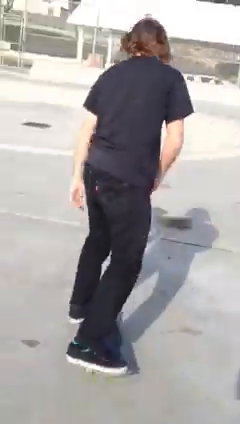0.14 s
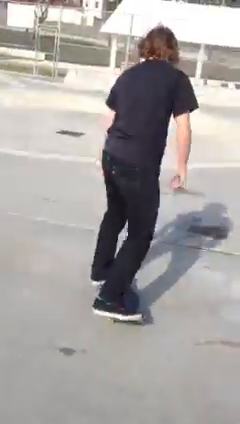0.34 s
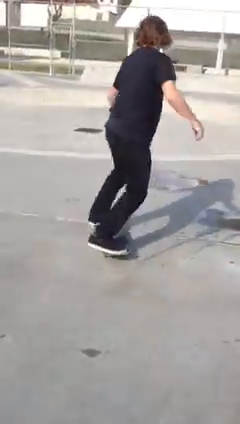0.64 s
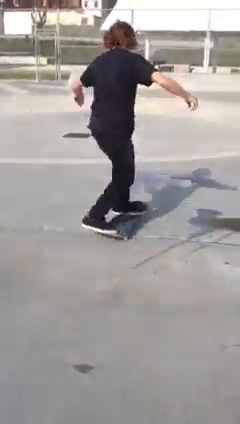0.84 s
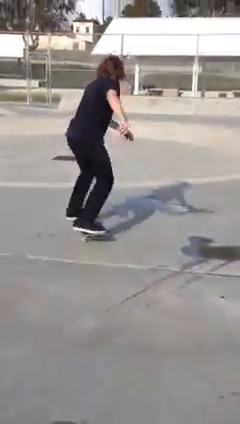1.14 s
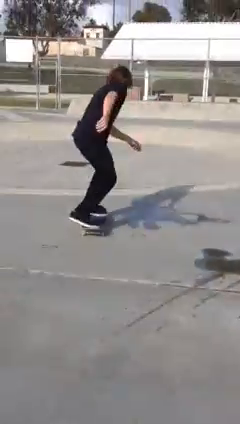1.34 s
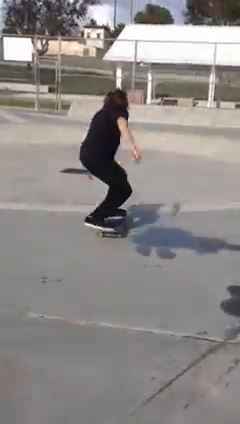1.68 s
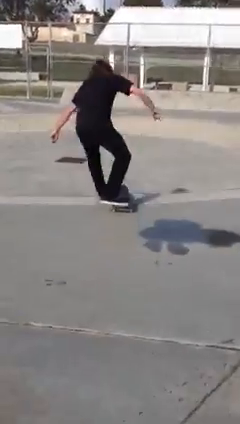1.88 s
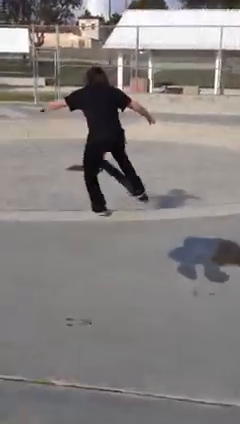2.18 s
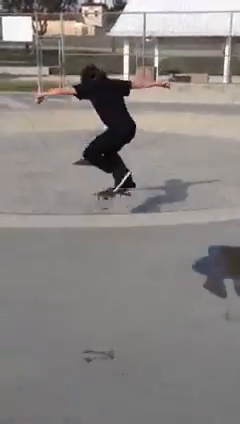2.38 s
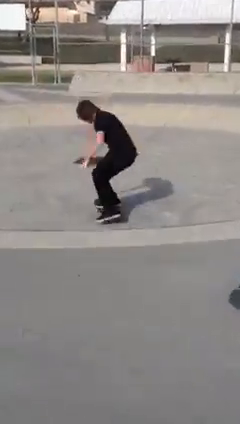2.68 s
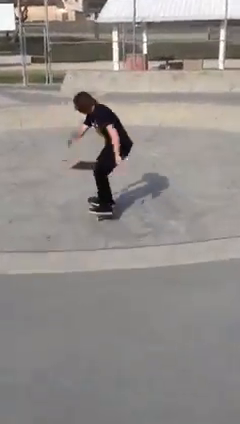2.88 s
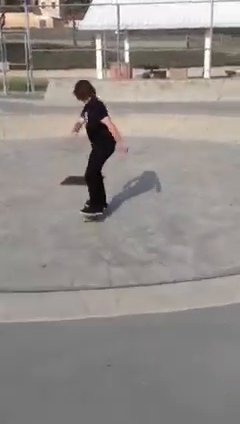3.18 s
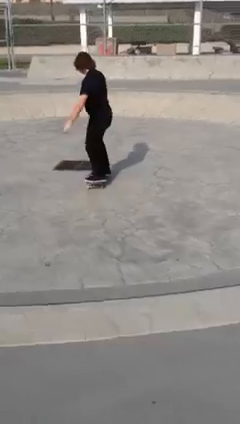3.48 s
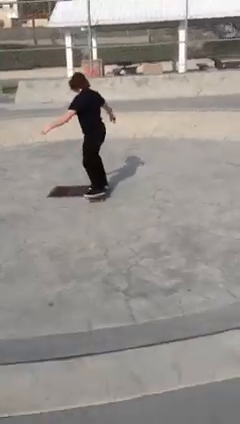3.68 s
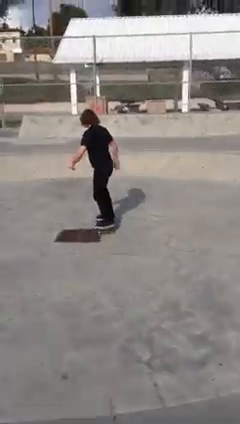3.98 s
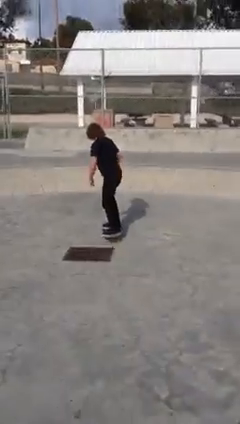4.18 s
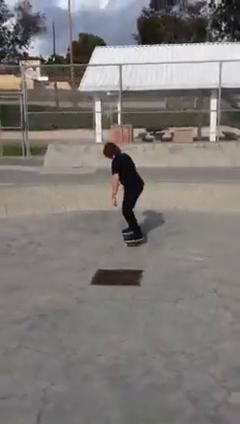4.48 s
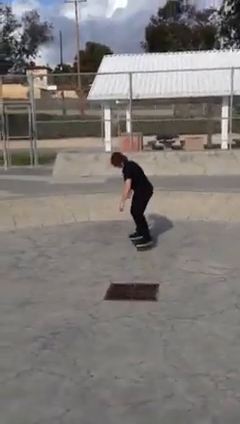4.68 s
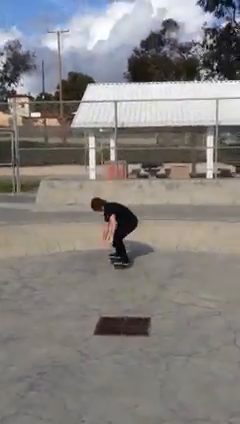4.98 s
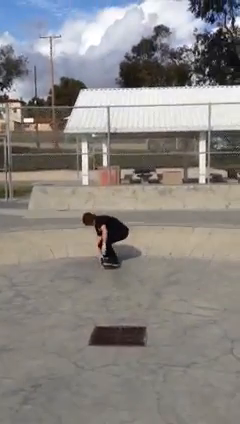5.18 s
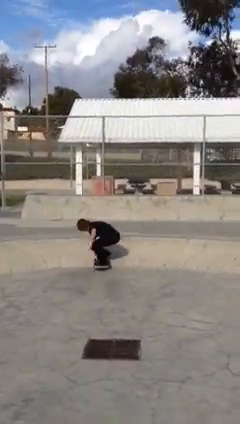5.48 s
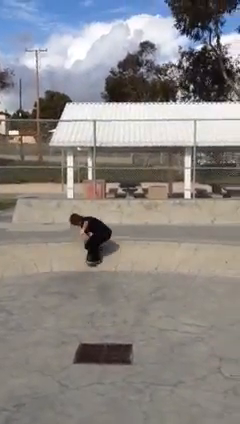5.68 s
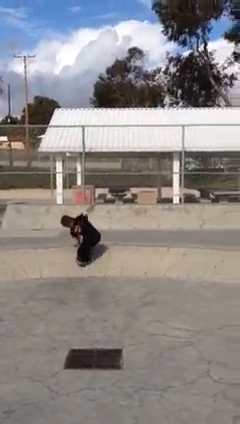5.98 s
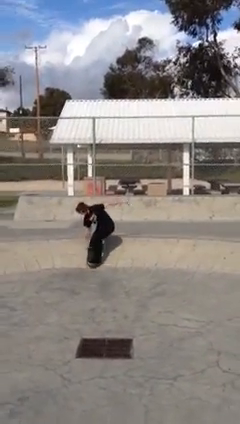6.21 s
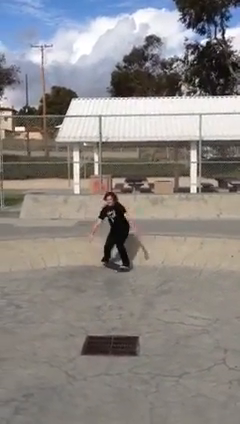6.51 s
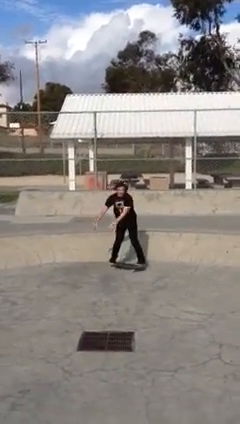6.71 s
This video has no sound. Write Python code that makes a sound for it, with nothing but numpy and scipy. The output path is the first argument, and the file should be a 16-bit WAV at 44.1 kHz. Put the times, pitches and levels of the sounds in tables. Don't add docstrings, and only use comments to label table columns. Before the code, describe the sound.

A skateboard rolls away with a grainy, hollow rumble. Close clacks snap in uneven clusters, followed by a tail scrape, a cracking landing and a duller, heavy slap with a rattle. Wind thumps low at the handheld microphone. Afterward come rough grit, dry scuffs and a few weaker distant pops, with short dull echoes from low concrete walls.

```python
import sys
import numpy as np
from scipy import signal
from scipy.fft import rfft, irfft, next_fast_len
from scipy.io import wavfile
from scipy.ndimage import uniform_filter1d

SR = 44100
rng = np.random.default_rng(int(sys.argv[2]) if len(sys.argv) > 2 else 0)


def pcm_store(signal):
    levels = np.round(np.clip(np.atleast_2d(signal), -1, 1) * 32767)
    wavfile.write(sys.argv[1], SR, levels.astype(np.int16).T)


def linear_from_db(decibels):
    return 10 ** (np.asarray(decibels, float) / 20)


N = 302085

# pitch_hz, level_db_per_hz
PARK = [(180, -34), (300, -13.5), (749, -6.5), (2100, -18.5), (5080, -24), (7080, -22), (10200, -26.5),
        (14700, -30), (16000, -31)]
# pitch_hz, level_db_per_hz
WIND = [(15, -63), (25, -51.5), (129, 6), (162, 7.5), (178, 7), (242, 1), (264, -34), (320, -43.5),
        (420, -62.5), (700, -120)]
# centre_s, half_length_s, change_db
GUSTS = [
    (1.85, 0.15, 12.5),
    (2.1, .05, -13),
    (2.55, 0.28, 4),
    (3.42, 0.23, 13.5),
    (3.82, 0.11, -11),
    (4.0, 0.024, 4),
    (4.4, 0.16, 4),
    (5.95, 0.089, 1.5),
    (6.5, 0.036, 7.5),
    (6.72, 0.064, -3),
]
# start_s, length_s, level_db, centre_hz
PUFFS = [(3.09, 0.036, -33.5, 161), (3.36, 0.034, -30.5, 163), (4.88, 0.056, -42, 133),
         (5.075, 0.052, -35, 170), (5.21, 0.085, -34.5, 164), (5.81, 0.054, -45, 120),
         (6.085, 0.028, -40, 132)]
# start_s, length_s, level_db, centre_hz
BEARINGS = [(1.42, 0.28, -55, 3580), (2.2, 0.24, -77, 8400), (2.2, 0.28, -79, 6200),
            (2.146, 0.021, -32.5, 4200), (2.146, 0.031, -35.5, 2800), (2.146, 0.023, -28, 1040),
            (3.7, 0.068, -43, 1580)]
# start_s, length_s, level_db, centre_hz
SCUFFS = [(1.245, 0.038, -40, 2480), (1.86, 0.032, -45.5, 7000), (2.04, 0.077, -40, 5000),
          (2.148, 0.023, -39, 2500), (3.32, 0.029, -42.5, 6600), (4.23, 0.018, -49, 4050),
          (4.305, 0.086, -44.5, 7300), (4.515, 0.055, -50.5, 7000), (4.59, .012, -51, 8000),
          (4.715, 0.011, -54, 8000), (4.775, 0.1, -44.5, 4870), (6.37, 0.016, -40, 6000),
          (6.42, 0.093, -36.5, 5340), (6.42, 0.064, -48.5, 900), (6.22, 0.18, -59.5, 725),
          (2.0, 0.065, -39.5, 1500), (3.12, 0.09, -49, 8000), (2.84, 0.17, -52.5, 11000),
          (3.52, 0.0504, -46, 7900), (6.17, .02, -56, 7040), (6.495, 0.068, -47, 7000)]
# time_s, deck_load_db, grit_db
ROLL = [(0, -35.5, -49), (.45, -42.5, -48.5), (.9, -45.5, -51), (1.35, -44.5, -48), (1.72, -40.5, -46.5),
        (2.2, -32, -45.5), (2.7, -35.5, -52.5), (3.1, -37, -49), (3.5, -33, -50), (3.87, -38.5, -55),
        (3.97, -44.5, -56), (4.43, -39, -53), (4.62, -50.5, -64), (5.27, -56, -60.5), (5.7, -45.5, -56),
        (5.951, -67.5, -76.5), (6.41, -45.5, -49.5), (6.85, -57, -59.5)]
# centre_s, half_length_s, extra_load_db, extra_grit_db
PATCHES = [
    (.21, 0.067, 3, 4),
    (2.03, 0.12, 10, -1.5),
    (2.1, 0.063, -4.5, 7.5),
    (3.66, 0.063, 6.5, 2),
    (4.33, 0.046, -0.3, 8),
    (4.88, 0.24, 12.5, 8),
    (5.7, .04, -5, 6),
    (6.63, 0.051, 0, 2.5),
    (2.95, 0.078, 1, 1),
]
# pitch_hz, width_hz, level_db
DECK = [(274, 164, 0.5), (408.6, 43, 7.5), (669, 33, -6.5), (921, 37, 3.5)]
# pitch_hz, level_db_per_hz
GRIND = [(700, -20), (1100, 0), (1700, -1), (1950, -9), (3200, -15), (4500, -30)]
# pitch_hz, width_hz, level_db
WHEELS = [(1140, 38, 5.5), (1580, 200, 7), (2280, 30, -0.5), (3540, 120, -4), (6150, 280, -31.5)]
# pitch_hz, level_db_per_hz
HISS = [(1470, -30.5), (2500, -2), (3600, -4.5), (4690, -1), (5190, -12.5), (5780, -7), (6350, -5.5),
        (7530, -8), (9150, -4.5), (10400, -18.5), (13600, -11.5), (15400, -21), (16000, -32)]
# pitch_hz, width_hz, level_db
RINGS = [(628, 43, 11.5), (644, 73, 12.5), (950, 610, -16), (1160, 89, 10)]
# pitch_hz, width_hz, level_db
THUD = [(71.5, 120, -30), (187, 42, -3), (274, 111, 0), (452, 97, 2.5)]
# pitch_hz, width_hz, level_db
TRUCKS = [(1500, 510, 26), (1816, 310, 14), (2040, 840, 19.5), (2700, 110, 4.5), (2970, 270, -6.5),
          (4300, 167, -41.5)]
# start_s, peak_db, hardness_db, rattle_ms, deck_ring_hz
JOINTS = [(.323, -18, -1, 13.6, 615), (.339, -12, -5.5, 4, 650), (.665, -11, -4, 6.5, 644),
          (.677, -11.5, -9, 6.9, 670), (.709, -19.5, -3.5, 16, 746), (.831, -21, 15, 9.7, 870),
          (.84, -14.5, 12.5, 6.2, 1070), (.965, -3.5, 0.5, 4.2, 810), (1.052, -8, 5.5, 4.8, 988),
          (1.271, -22.5, 0.5, 3, 695), (1.413, -18.5, 4.5, 10.4, 1090)]
FLIP = [(2.018, -17.5, -8, 17, 750), (2.048, -13.5, -2.5, 5.4, 598), (2.091, -12, 7.5, 6.8, 974),
        (2.148, -23, -4, 17, 1030), (2.549, -5.5, -3, 3.7, 763), (2.594, -15.5, 6.5, 10, 694),
        (2.616, -12, -2, 6.3, 910)]
DROP = [(3.587, -3.5, -13.5, 12.8, 484), (3.603, -11.5, 19.5, 3.7, 1160), (3.632, -15, -6, 12, 600),
        (3.655, -22.5, -12, 4.2, 625), (3.813, -21, 4, 10.6, 630), (3.85, -21.5, 4, 6.2, 666),
        (3.876, -13, -1, 7.5, 740), (3.886, -12, -1, 5.5, 605)]
FAR = [(5.505, -16.5, -7, 6.6, 474), (5.672, -20, 0, 7.1, 850), (6.334, -27.5, 3.7, 3.6, 770),
       (6.348, -24, -5, 9.4, 704), (6.483, -22, 10, 11, 487), (6.835, -24.5, 10.5, 10, 677)]
# start_s, peak_db, hardness_db, rattle_ms
TICKS = [(.15, -31, 1, 3.9), (.869, -29, -3, 2.9), (1.066, -24.5, 12.5, 5.1), (1.114, -38.5, 12.5, 6.9),
         (1.445, -26.5, 3, 2.4), (2.688, -32.5, 0, 11), (3.132, -32, 2, 7.2), (3.17, -40, 13, 4.5),
         (3.642, -15.5, -12, 1.6), (3.74, -28.5, 6, 5.6), (4.171, -36, 3, 8.8), (4.568, -37.5, 4, 6.4),
         (4.903, -30, -0.5, 4.4), (5.699, -38, -4, 8.7), (6.032, -52.5, 14.5, 7), (6.22, -48, 10, 8.9),
         (5.578, -60, 21, 2.5), (1.921, -26.5, 2, 6.4), (.965, -7, 2, 1.85), (6.515, -30, 11.5, 9.2)]
BUMPS = [(.749, -42, 1, 3.6), (.983, -26, 2, 2.3), (1.923, -28, -6, 9), (1.962, -23.5, -15, 11.5),
         (1.972, -40, 2.5, 10.5), (2.057, -23, 6, 7.5), (2.078, -25, 9, 20), (3.354, -38, -7, 8.6),
         (.84, -24.5, -11, 3), (3.914, -39, -1, 9.4), (4.456, -42, -14, 2.5), (5.539, -44, 2, 5.4)]
# pitch_hz, level_db
PORT = [(100, 0), (4950, 0), (5150, -2.5), (5350, 0.5), (9900, -1.5), (10300, -3), (10800, -1.5),
        (16000, 0.5)]


def unit(x):
    return x / np.sqrt(np.mean(x ** 2))


def resonate(x, modes):
    out = 0
    for k, (hz, width, db) in enumerate(modes):
        b, a = signal.iirpeak(hz, hz / max(width, 60), fs=SR)
        out = out + (-1) ** k * linear_from_db(db) * signal.lfilter(b, a, x)
    return out


def colour(x, points):
    hz, db = np.transpose(points)
    size = next_fast_len(len(x))
    f = np.maximum(np.arange(size // 2 + 1) * SR / size, 1)
    gain = linear_from_db(np.interp(np.log(f), np.log(hz), db))
    return irfft(rfft(x, size) * gain, size)[:len(x)]


def band(x, lo_hz, hi_hz, order=2):
    return signal.sosfilt(signal.butter(order, [lo_hz, hi_hz], "band", fs=SR, output="sos"), x)


def walk(rate):
    hold = int(SR / rate)
    steps = np.repeat(rng.standard_normal(N // hold + 1), hold)
    return np.clip(unit(uniform_filter1d(steps, hold)[:N]), -2, 2)


def grit(size, rate, spread_db):
    chance = rng.random((3, size))
    struck_now = chance[0] < rate / SR
    grain_db = spread_db * np.minimum(-np.log(1 - chance[2]), 4.5)
    return struck_now * np.sign(chance[1] - .5) * linear_from_db(grain_db)


def patchy(x, edges_hz, rate, patchy_db):
    lows = [0] + [signal.lfilter(*signal.butter(1, hz, fs=SR), x) for hz in edges_hz] + [x]
    return sum((hi - lo) * linear_from_db(patchy_db * walk(rate)) for lo, hi in zip(lows, lows[1:]))


def swell(table):
    s, half, *db = np.transpose(table)
    age = (np.arange(N) / SR - s[:, None]) / half[:, None]
    return np.array(db) @ np.exp(-age ** 2)


def add(out, s, x):
    i = int(s * SR)
    out[i:i + len(x)] += x[:N - i]


def bursts(table, octaves, fade, stutter_db):
    out = np.zeros(N)
    for s, length, level_db, centre_hz in table:
        size = int(max(length, .01) * SR)
        lo_hz, hi_hz = centre_hz / 2 ** octaves, min(centre_hz * 2 ** octaves, 16000)
        noise = band(grit(size=24000, rate=16000, spread_db=6.5), lo_hz, hi_hz)
        shape = signal.windows.tukey(size, np.clip(fade, .1, 1))
        add(out, s, unit(noise[2000:2000 + size]) * shape * linear_from_db(level_db))
    return out * linear_from_db(stutter_db * walk(110))


def park():
    return unit(colour(rng.standard_normal(N), PARK)) * linear_from_db(-60)


def breeze():
    wind = colour(rng.standard_normal(N), WIND)
    return unit(wind) * linear_from_db(-54 + swell(GUSTS)[0] + 2.94 * walk(40))


def puffs():
    return bursts(PUFFS, 0.53, fade=0.64, stutter_db=2.9)


def echo(x):
    gap_s, t60_s, level_db = 0.0031, 0.33, -26
    t = np.arange(12000) / SR
    tail = band(rng.standard_normal(len(t)), 130, 3050, order=1)
    tail = tail * (t > gap_s) * np.exp(-np.log(1000) * t / t60_s)
    return signal.fftconvolve(x, tail / np.sqrt(np.sum(tail ** 2)))[:N] * linear_from_db(level_db)


def bearings():
    return bursts(BEARINGS, 0.098, fade=0.42, stutter_db=2)


def scuffs():
    rubber = [(100, 24.5), (4600, -3.0), (5200, -9), (5900, -3.5), (9500, -5.0), (10500, -6.5), (16000, -5)]
    return colour(bursts(SCUFFS, 1.07, fade=0.46, stutter_db=2.66), rubber)


def rolling():
    s, *columns = np.transpose(ROLL)
    t = np.arange(N) / SR
    deck_db, hiss_db = np.array([np.interp(t, s, c) for c in columns]) + swell(PATCHES)
    load_share = 0.28
    grind_db = -2.5 + load_share * deck_db + (1 - load_share) * hiss_db
    load = walk(25)
    kicks = grit(N, 2600, spread_db=3.2)
    deck = band(resonate(kicks, DECK) + 0.79 * band(kicks, 274, 2700), 180, 1053)
    grind = colour(grit(N, 3000, spread_db=2.5), GRIND)
    grind = patchy(grind, [1500, 2400], rate=25, patchy_db=1)
    hiss = colour(grit(N, 9000, spread_db=2.2), HISS)
    hiss = patchy(hiss, [4000, 7500, 11000], rate=18, patchy_db=2.2)
    wheel_rings = sum(linear_from_db(4 * walk(5)) * resonate(kicks, [ring]) for ring in WHEELS)
    grind = unit(grind) + linear_from_db(-6.5) * unit(wheel_rings)
    return (unit(deck) * linear_from_db(deck_db + 0.19 * load)
            + unit(grind) * linear_from_db(grind_db + 0.13 * load)
            + unit(hiss) * linear_from_db(hiss_db - 2.1 + 0.34 * load + 0.39 * walk(33)))


def struck(modes):
    place = rng.standard_normal((len(modes), 2))
    return [(hz * (1 + .04 * a), width, db + 2 * b) for (hz, width, db), (a, b) in zip(modes, place)]


def blow(peak_db, hard_db, rattle_ms, deck_hz, body_db, thud_db, knock_db, crack_db):
    t = np.arange(5000) / SR
    head = slice(0, 900)
    age = t / (np.clip(rattle_ms, 2, 40) / 1000)
    rise = np.minimum(age / 0.39, 1)
    contacts = grit(len(t), 1800, spread_db=2.5) + 0.58 * rng.standard_normal(len(t))
    contacts = contacts * rise * np.exp(-age ** 1.05)
    contacts[30] += 3.08
    sand_fade = np.exp(-age ** 1.2) + 0.076 * np.exp(-age / 5.2)
    sand = grit(len(t), 10000, spread_db=3.0) * rise * sand_fade
    deck_ring = [(hz, 90, 17) for hz in deck_hz]
    truck_ring = [(1270 + 0.38 * hz, 110, 7) for hz in deck_hz]
    body = resonate(contacts, struck(RINGS) + deck_ring + truck_ring) + 1.3 * band(contacts, 743, 1970)
    body = band(body, 350, 1570)
    thud = resonate(contacts, struck(THUD))
    knock = band(resonate(contacts, struck(TRUCKS) + truck_ring) + 0.99 * contacts, 1550, 3980, order=3)
    crack = band(colour(sand, HISS), 5100, 13000)
    x = body / np.abs(body).max() * linear_from_db(body_db)
    for part, db in ((thud, thud_db - 0.11 * hard_db),
                     (knock, knock_db + 0.5 * hard_db),
                     (crack, crack_db + hard_db)):
        x = x + part / part[head].std() * linear_from_db(db)
    return x * linear_from_db(peak_db)


def strike(table, **split_db):
    out = np.zeros(N)
    for s, peak_db, hard_db, rattle_ms, *deck_hz in table:
        add(out, s, blow(peak_db, hard_db, rattle_ms, deck_hz, **split_db))
    return out


def blows():
    return (strike(FAR, body_db=3, thud_db=-13.5, knock_db=-17, crack_db=-20)
            + strike(BUMPS, body_db=0.9, thud_db=-2, knock_db=-10, crack_db=-33)
            + strike(TICKS, body_db=3.3, thud_db=-18.5, knock_db=-16.5, crack_db=-23.5)
            + strike(DROP, body_db=2.4, thud_db=-9, knock_db=-19.5, crack_db=-57)
            + strike(FLIP, body_db=1.4, thud_db=-15, knock_db=-14, crack_db=-26)
            + strike(JOINTS, body_db=1.3, thud_db=-20.5, knock_db=-16, crack_db=-25))


def scene():
    hits = blows()
    background = park() + breeze() + puffs()
    board = bearings() + scuffs() + rolling()
    return (background + echo(hits) + board + hits)[None]


def low_pass(x):
    return signal.sosfilt(signal.butter(12, 16440, fs=SR, output="sos"), x)


def record(dry):
    x = colour(dry[0], PORT)[None]
    x = signal.sosfilt(signal.butter(1, 60, "high", fs=SR, output="sos"), x)
    x = np.tanh(0.69 * x) / 0.88
    x = signal.sosfilt(signal.ellip(6, .2, 22, 15250, fs=SR, output="sos"), x)
    x = signal.sosfilt(signal.ellip(10, .2, 60, 16500, fs=SR, output="sos"), x)
    return low_pass(x)


dry = scene()
out = record(dry)
pcm_store(out)
```